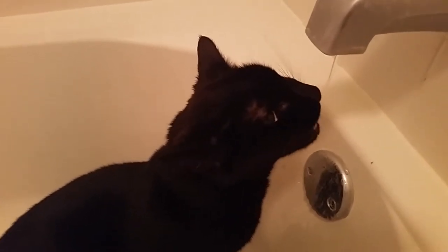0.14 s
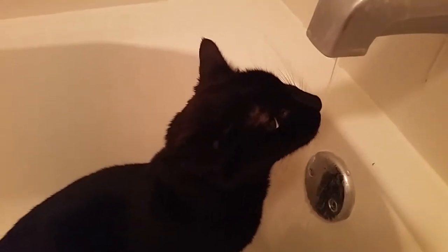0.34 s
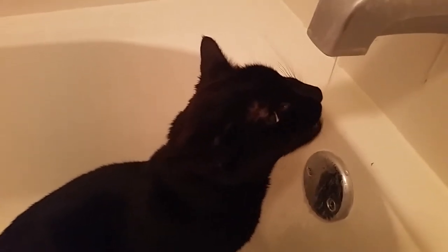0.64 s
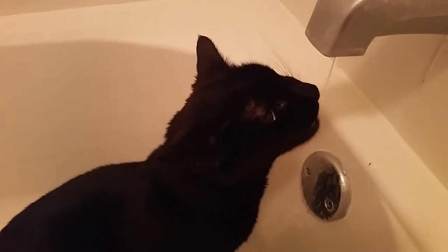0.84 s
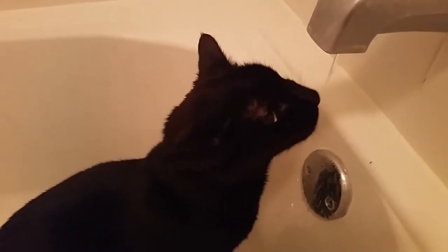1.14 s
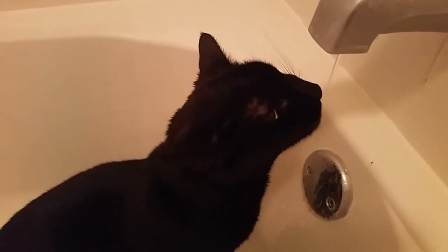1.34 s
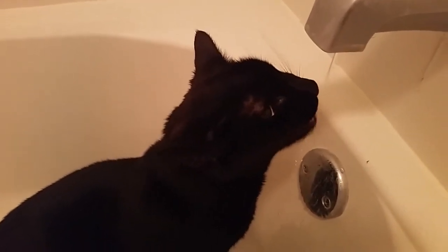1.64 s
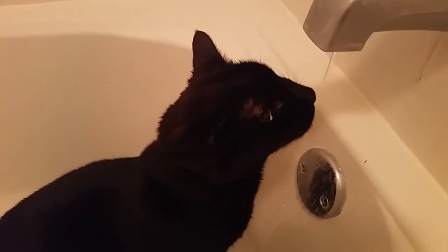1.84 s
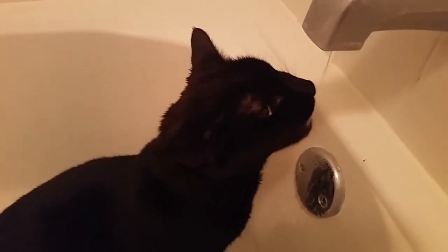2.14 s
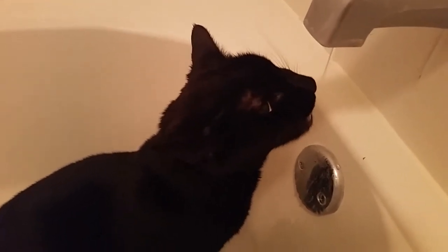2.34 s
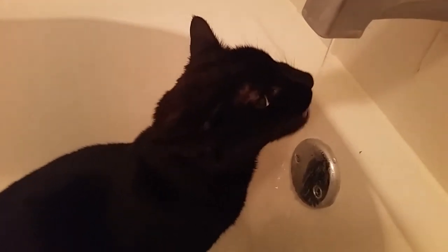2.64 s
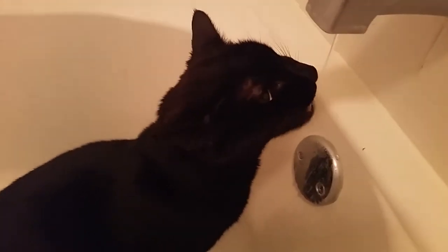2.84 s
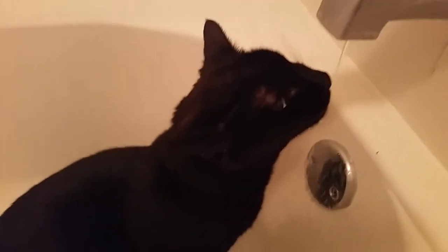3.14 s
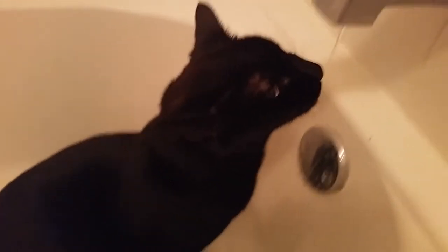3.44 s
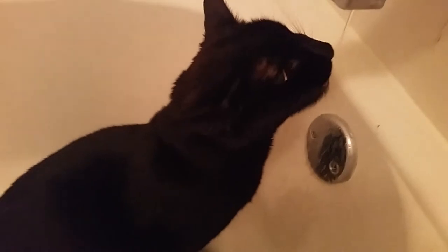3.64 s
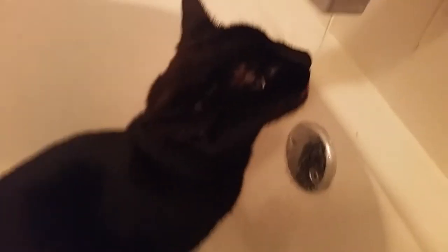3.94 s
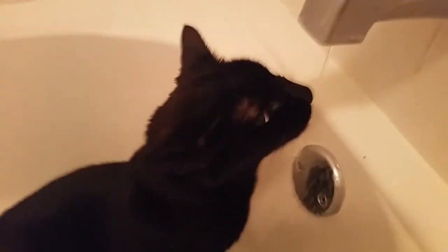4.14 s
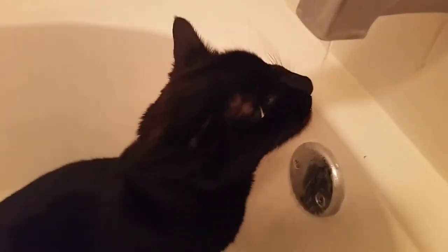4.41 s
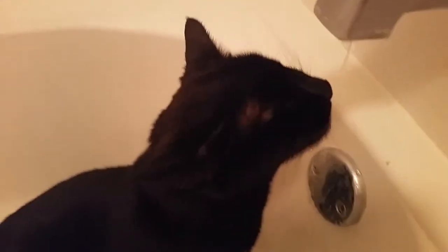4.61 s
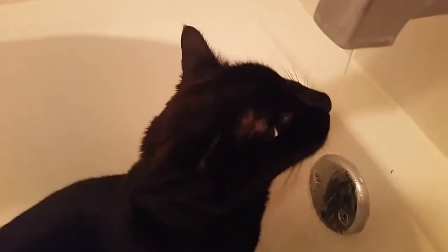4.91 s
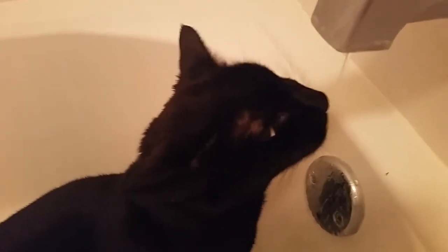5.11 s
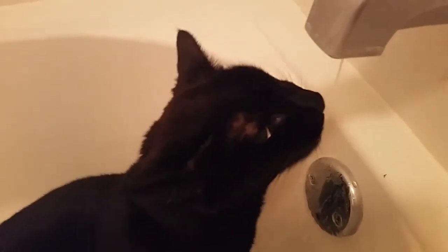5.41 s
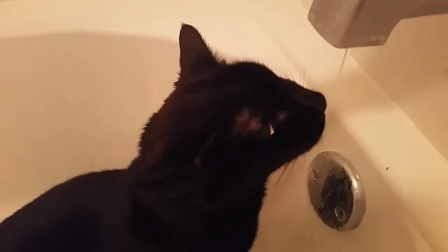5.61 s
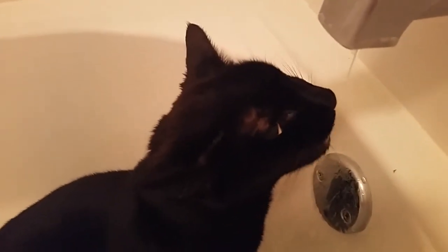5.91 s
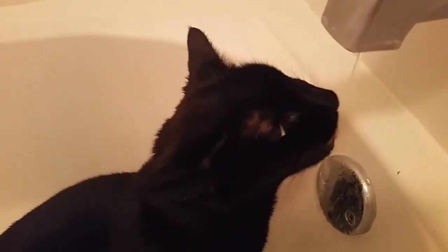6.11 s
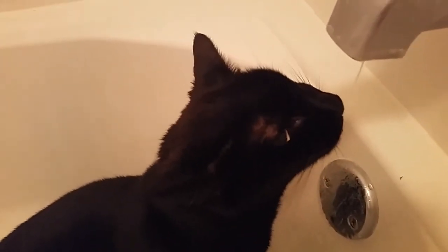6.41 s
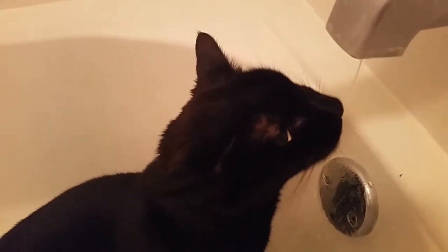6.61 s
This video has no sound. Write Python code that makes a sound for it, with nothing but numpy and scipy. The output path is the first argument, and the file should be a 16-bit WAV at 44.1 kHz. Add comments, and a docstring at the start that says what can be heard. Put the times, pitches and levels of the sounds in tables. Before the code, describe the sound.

A cat laps water from a thin tap stream in a bathtub with wet clicks, while a hand bumps and scrapes the microphone midway.

```python
"""In a bathtub, a cat laps from a thin tap stream, close to a hand-held phone with two microphones.
Each lap is a hollow pop of the mouth and a bright smack of tongue on water that rings on in the tub.
Small drops tick and a faint wet crackle runs between the laps. The hand shifting on the phone case
gives knocks, rumble and a burst of scraping. Room air and the hiss of the stream lie behind it all."""
import sys
import numpy as np
from scipy import signal
from scipy.io import wavfile
from scipy.ndimage import uniform_filter1d

SR = 44100
rng = np.random.default_rng(int(sys.argv[2]) if len(sys.argv) > 2 else 0)


def unload_audio(sound):
    """Save the sound as a 16-bit wav file, at the path given as the first command line argument."""
    columns = np.transpose(np.atleast_2d(sound))
    # keep every value between -1 and 1, then stretch to whole-number steps
    steps = np.round(np.clip(columns, -1, 1) * 32767)
    wavfile.write(sys.argv[1], SR, steps.astype(np.int16))


N = 298116

# Pops of the tongue: t/s, level/dB, boost of the upper mouth tones/dB
TONGUE_POPS = [(0.116, -41, -16), (0.323, -43.5, -13.5), (0.658, -53.5, 3), (0.885, -53, -5),
               (1.084, -44.5, -18), (1.397, -60, 11.5), (1.586, -49, -12), (1.785, -45, -17),
               (2.11, -49.5, -5.5), (2.299, -47, -15), (2.499, -47.5, -10), (2.848, -52.5, 3.5),
               (3.035, -43, -10), (4.46, -51, -1.5), (4.83, -52, -8), (5.157, -49.5, -3),
               (5.345, -42, -11.5), (5.536, -43, -11), (5.682, -51, -15), (5.878, -45.5, -6),
               (6.082, -43.5, -13.5), (6.283, -33.5, -24), (6.49, -41, -11.5), (6.513, -44.5, -13)]
# Tones of the hollow mouth: f/Hz, level/dB, time to fade by 60 dB/s
MOUTH_TONES = [(491, 12, 0.012), (1346, 15, 0.0096), (1020, 5, 0.021), (2060, 6, 0.004)]
# Tongue hits water: t/s, level/dB, then relative to it: top band/dB, two low bands/dB, click/dB
WATER_SMACKS = [(0.1434, -51, 5, 0, 8), (0.172, -51, 17.5, -4, 8.5), (0.348, -49, 7, 1, 5),
                (0.428, -74, 18.5, -5, 13), (0.6903, -48, 3, -4, -0.5), (0.805, -63.5, 16.5, 1.5, 7),
                (0.845, -55, 1, -4.5, 9.5), (0.885, -44.5, 2.5, -13.5, 3.5), (1.0911, -54, 0.5, -11, 22.5),
                (1.614, -50, 7.5, -5.5, 4), (1.8096, -52, 3, -5, 14.5), (2.1406, -58.5, 6, -4, 12.5),
                (2.334, -50.5, 1.5, -12.5, 10), (2.525, -47, 2.5, -5, 8), (2.8768, -50, 1.5, -5, 9.5),
                (3.073, -48.5, 0, -4.5, 4), (3.144, -59.5, 15, -2, 10), (3.266, -43.5, 0, -11, 3),
                (3.332, -49, 2.5, -10, 8.5), (3.4753, -53, -1, -1.5, 11), (3.631, -78, -22, -8, 10),
                (3.748, -51, -5, -6.5, 7.5), (3.7953, -39.5, 3, -8, 5), (3.972, -38.5, 3.5, -11, 2),
                (4.1, -46.5, 15, -8, -9), (4.4864, -58.5, 2, -18, 23.5), (4.6646, -54, -5, -3.5, 4.5),
                (4.853, -53, 2, 0, 7), (5.3711, -50, 5.5, -0.5, 8), (5.406, -74, 20, -14, 16),
                (5.5654, -55, -2, -5.5, 17), (5.5931, -54.5, -5, -18, 27.5), (5.93, -57.5, 6, -6, 7),
                (6.1079, -52.5, 4, -6.5, 5.5), (6.3113, -51.5, 8, 0.5, 8), (6.517, -50.5, 4, 0, 7)]
# Bands in which the wet sounds lie, highest first: f/Hz, width/Hz, pan/dB (pan is left level minus right level)
WET_BANDS = [(11880, 5300, -5.5), (7450, 2900, 5), (4400, 2700, -1), (1540, 2500, 6.5)]
# Drops and bubbles at the mouth: t/s, level/dB, f/Hz
DROP_TICKS = [(0.169, -44, 3870), (0.3596, -40.5, 3900), (0.374, -41, 4200), (0.7432, -49, 3820),
              (1.679, -49.5, 3800), (2.931, -45, 3560), (3.0312, -49.5, 3550), (3.4696, -47, 3650),
              (4.723, -48, 3540), (4.8112, -49, 3670), (4.8226, -48, 3460), (4.8539, -46, 4950),
              (4.9673, -50, 3500), (5.239, -50, 3580), (6.1833, -51, 3470), (5.5598, -48, 3570),
              (5.9646, -45.5, 3530), (6.5405, -45, 3360)]
# Fingers knock the case: t/s, level/dB, f/Hz, pan/dB, relative level of the sharp edge/dB
FINGER_KNOCKS = [(1.067, -29, 142, -17, -25), (1.179, -31, 122, -16, -41), (1.21, -27.5, 140, -11, -34),
                 (1.415, -29.5, 137, -14, -21), (1.9215, -33.5, 134, -10, -21),
                 (2.347, -21.5, 121, -15, -18), (2.751, -25.5, 97, 15, 5.5), (2.992, -21.5, 203, 8, -4),
                 (3.0001, -23.5, 224, 16, 11.5), (3.16, -25, 74, -12, -4.5), (3.22, -10, 110, 14, -12),
                 (3.421, -10.5, 102, 27, -12), (3.491, -31, 122, 5, -4), (3.766, -21.5, 136, -38, -6),
                 (3.791, -13, 76, 12, 2), (3.877, -25.5, 149, -31, -33), (3.912, -24.5, 104, 33, -12),
                 (3.958, -19, 122, 10, -28), (4.048, -7, 104, -21, 6), (4.96, -35, 127, -0.5, -26),
                 (5.679, -37.5, 144, -2, -24)]
# Skin slides over the case: t/s, length/s, grind level/dB, brush level/dB
SKIN_SLIDES = [(3.212, 0.063, -34.5, -52.5), (3.267, 0.14, -51.5, -59), (3.413, 0.11, -43.5, -55.5),
               (3.489, 0.093, -32.5, -60), (3.625, 0.081, -60, -51.5), (3.713, 0.037, -47, -57),
               (3.773, 0.029, -30.5, -49.5), (3.879, 0.018, -44.5, -51.5), (3.903, 0.026, -39.5, -57),
               (3.94, 0.03, -35, -49.5), (3.966, 0.068, -82, -58.5), (4.057, 0.057, -28.5, -53.5),
               (4.119, 0.071, -36.5, -53.5), (4.165, 0.048, -33.5, -52), (4.23, 0.13, -47, -66.5),
               (4.472, 0.13, -46, -72), (4.61, 0.069, -49, -90), (5.413, 0.077, -51.5, -88),
               (6.362, 0.21, -62, -63.5)]
# Tone colour of the skin's low grind: f/Hz, relative level/dB
GRIND_COLOUR = [(47, -56), (80, 0.5), (261, -1.5), (451, -10), (1210, -20), (1660, -33), (3000, -56),
                (6600, -120)]
# Tone colour of its softer brushing: f/Hz, relative level/dB
BRUSH_COLOUR = [(600, 25.5), (1300, 27), (2400, 19.5), (3600, 2), (5000, -61)]
# Tone colour of its bright rustle: f/Hz, relative level/dB
RUSTLE_COLOUR = [(1470, -22), (2500, -4.5), (3690, 0), (4680, -10), (6740, 3.5), (8230, -7.5), (11900, -5),
                 (14600, -13), (15000, -60)]
# Rumble of the gripping hand over time: t/s, level/dB, pan/dB
GRIP_LEVELS = [(0, -44, -12), (1.7, -46.5, -3), (2.25, -52, -5.5), (2.7, -41, -2), (3.6, -35.5, -3.5),
               (4.2, -35.5, 8.5), (4.7, -48.5, 12), (5.45, -45, 10), (5.9, -51.5, 10.5), (6.76, -49, 12.5)]
# Tone colour of that rumble: f/Hz, relative level/dB
RUMBLE_COLOUR = [(18, -40), (30, 9.5), (146, 0.5), (195, -8), (484, -21), (700, -28.5), (1540, -120)]
# Tone colour of room air and tap hiss: f/Hz, relative level/dB
AIR_COLOUR = [(240, 3.5), (400, 1), (1640, -17), (2000, -9), (2870, -22), (3830, -22.5), (5110, -21),
              (5950, -26), (6920, -15.5), (9370, -29), (12100, -17.5), (14100, -22), (15000, -78)]
# Which side the air and hiss lean to: f/Hz, pan/dB
AIR_SIDES = [(500, 1.5), (2000, 5.5), (5000, -2.5), (12000, -1)]
# Treble of the hiss over time: t/s, relative level/dB
HISS_TREBLE = [(0, 9.5), (0.5, 2.5), (2.8, -1), (4.3, 1), (6.76, 0.5)]


def tongue_pops():
    """The hollow mouth rings briefly as the tongue tears loose from it."""
    out, t = np.zeros((2, N)), np.arange(2000) / SR
    for (start, db, upper_db), detune in zip(TONGUE_POPS, rng.standard_normal((len(TONGUE_POPS), 4))):
        boosts_db = [0, upper_db, upper_db, upper_db]
        mouth = sum(amp(tone_db + boost_db) * ring(t, hz * (1 + 0.05 * off), fade_s)
                    for (hz, tone_db, fade_s), boost_db, off in zip(MOUTH_TONES, boosts_db, detune))
        tear = 0.17 * rng.standard_normal(400) * fade(t[:400], 0.0035)
        tear[0] = 1  # one clean kick leads the rough tearing
        pop = np.convolve(mouth * rise(t, 0.00091), tear)
        add(out, start, amp(db) * panned(2.2) * pop)
    return out + amp(-10) * tub_echo(out, fade_s=0.18, dull_hz=2500)


def water_smacks():
    """The tongue hits with a sharp click, then the water film breaks in tiny snaps."""
    out, t = np.zeros((2, N)), np.arange(6000) / SR
    for start, level_db, top_db, low_db, click_db in WATER_SMACKS:
        detune, drift = rng.standard_normal((2, 4, 1))
        bands = wet_hiss(len(t), pitch_ratios=1 + 0.03 * detune + 0.05 * drift * rise(t, 0.04))
        shared = snaps(len(t), per_s=100, spread_db=0.5, fade_s=0.0066)
        click = amp(click_db) * fade(t, 0.0083)
        for db, band in zip([top_db, 0, low_db, low_db - 0.5], bands):
            film = 0.04 + 0.56 * shared + 0.41 * snaps(len(t), per_s=260, spread_db=4, fade_s=0.0033)
            shape = click + film * rise(t, 0.0049) * fade(t, 0.28)
            add(out, start, amp(level_db + db) * shape * rise(t, 0.00043) * band)
    return out + amp(-2.5) * tub_echo(out, fade_s=0.22, dull_hz=10400)


def wet_hiss(size, pitch_ratios):
    """Bands of hiss for the wet sounds, each with a narrow peak that can glide."""
    white, bands = rng.standard_normal((2, size)), []
    for (hz, width, pan_db), ratio in zip(WET_BANDS, pitch_ratios):
        wide = signal.butter(3, [hz - width / 2, hz + width / 2], "bandpass", fs=SR, output="sos")
        hiss = evened(signal.sosfilt(wide, white))
        # Shift the peak's pitch down to zero, smooth there, and shift back up.
        turn = np.exp(2j * np.pi * np.cumsum(hz * ratio * np.ones(size)) / SR)
        hold = np.exp(-np.pi * hz / 11 / SR)
        peak = evened((turn * signal.lfilter([1 - hold], [1, -hold], hiss / turn)).real)
        bands.append(panned(pan_db) * evened(0.4 * hiss + peak))
    return bands


def snaps(size, per_s, spread_db, fade_s):
    """Loudness outline of tiny snaps at random times, a few stronger than the rest."""
    strength = amp(spread_db * np.minimum(rng.exponential(1, size), 4))
    happens = rng.random(size) < per_s / SR
    return signal.lfilter([1], [1, -fade(1 / SR, fade_s)], strength * happens)


def tub_echo(sound, fade_s, dull_hz):
    """The hard tub walls throw back many quick echoes that die away."""
    echoes = np.zeros((2, SR // 2))
    slots = np.arange(90, SR // 2 - 20, 20)
    delays = slots + rng.integers(0, 20, (2, len(slots)))
    np.put_along_axis(echoes, delays, rng.choice([-1., 1.], delays.shape), 1)
    echoes *= fade(np.arange(SR // 2) / SR, fade_s)
    echoes = signal.lfilter(*signal.butter(1, dull_hz, fs=SR), echoes)
    return signal.fftconvolve(sound, echoes / np.linalg.norm(echoes[0]), axes=1)[:, :N]


def wet_crackle():
    """Faint, soft-edged wet snaps carry on between the laps."""
    shared = snaps(N, per_s=10, spread_db=2.5, fade_s=0.015)
    per_band = [snaps(N, per_s=10, spread_db=2.5, fade_s=0.01) for _ in WET_BANDS]
    softened = uniform_filter1d(shared + np.array(per_band), size=40, axis=1)
    levels_db, bands = [-60, -66.5, -97.5, -98], wet_hiss(N, pitch_ratios=np.ones(4))
    return sum(amp(db) * shape * band for db, shape, band in zip(levels_db, softened, bands))


def droplets():
    """Each small drop is a short tick that echoes in the tub; fainter ones fall at random."""
    out, t = np.zeros((2, N)), np.arange(600) / SR
    stray_per_s, stray_db, stray_hz = 6, -63, 3635
    wait, size, pitch = rng.random((200, 3)).T
    times = np.cumsum(-np.log(1 - wait)) / stray_per_s
    strays = np.transpose([times, stray_db + 9 * size, stray_hz * (1 + 0.3 * (pitch - 0.5))])
    for start, db, hz in [*DROP_TICKS, *strays[times < N / SR]]:
        tick = ring(t, hz, 0.008) + 0.35 * ring(t, 2.3 * hz, 0.003)
        add(out, start, amp(db) * panned(3.2) * tick * rise(t, 0.00014))
    return out + amp(-9) * tub_echo(out, fade_s=0.14, dull_hz=8000)


def finger_knocks():
    """A finger bumps the case: a low thump, a sharp edge and the case's hollow ring."""
    out, t = np.zeros((2, N)), np.arange(8000) / SR
    clack = ring(t, 380, 0.0049) + 0.41 * ring(t, 1030, 0.0085) + 0.14 * ring(t, 2430, 0.0051)
    bright = evened(signal.lfilter(*signal.iirpeak(11900, 3, fs=SR), rng.standard_normal(len(t))))
    edge = amp(-24.5) * fade(t, 0.0045) * bright - clack * rise(t, 0.00069)
    case_ring = ring(t, 259.2, 0.44) * rise(t, 0.022)
    soft_cycles, soft_db, damping = 10.5, -25, 0.86
    for start, db, hz, pan_db, edge_db in FINGER_KNOCKS:
        # A harder knock presses on longer and so stops its own thump sooner.
        fade_s = soft_cycles / hz * amp(-damping * max(db - soft_db, 0))
        falling_hz = hz * (1 + 1.1 * np.exp(-t / 0.006))
        thump = -ring(t, falling_hz, fade_s) * rise(t, 0.0007)
        knock = thump / abs(thump).max() + amp(edge_db) * edge
        flip = [[1], [-1 if pan_db > 0 else 1]]  # a knock on the left turns the right wave upside down
        add(out, start, amp(db) * panned(pan_db) * flip * knock)
        add(out, start, amp(db + 0.37 * edge_db - 20) * np.outer([1, 0.3], case_ring))
    return out


def skin_scrapes():
    """Skin slips unevenly near the left microphone: a low grind, a brushing and a bright rustle."""
    grind = noise(GRIND_COLOUR, patchy_db=1.5, alike=0.07, size=1024)
    grind *= wobble(0.0054, 3) * wobble(0.016, 1.8)
    brush = noise(BRUSH_COLOUR, patchy_db=1, alike=0.033, size=256) * wobble(0.0069, 0.23)
    rustle = noise(RUSTLE_COLOUR, patchy_db=3.2, alike=0.081, size=256) * wobble(0.0035, 2.1)
    low = panned(15.5) * grind
    high = panned(7.75) * brush + amp(-8.5) * panned(0.045) * rustle
    out = np.zeros((2, N))
    for start, length, grind_db, brush_db in SKIN_SLIDES:
        t = np.arange(0, length + 0.071, 1 / SR)
        swell = 0.89 + 0.81 * np.sin(np.pi * np.minimum(t / length, 1))
        let_go = np.exp(-np.maximum(t - length, 0) / 0.009)
        here = round(start * SR) + np.arange(len(t))
        rub = amp(grind_db) * low[:, here] + amp(brush_db) * high[:, here]
        add(out, start, rise(t, 0.0017) * swell * let_go * rub)
    return out


def grip_rumble():
    """The hand shifting its grip makes a lumpy rumble, unrelated at the two microphones."""
    db, pan_db = over_time(GRIP_LEVELS, np.arange(N) / SR)
    rumble = noise(RUMBLE_COLOUR, patchy_db=2.93, alike=0, size=2048)
    return amp(db) * panned(pan_db) * wobble(0.019, 2.2) * rumble


def air_and_tap():
    """Steady room air and the faint hiss of the stream, whose treble drifts in level."""
    size = 512
    grid, hz = noise_grid(AIR_COLOUR, patchy_db=3.34, alike=0.094, size=size)
    treble_db, = over_time(HISS_TREBLE, np.arange(grid.shape[2]) * (size // 4) / SR)
    treble_share = np.clip(hz / 3000 - 2.3, 0, 1)
    grid *= amp(np.outer(treble_share, treble_db))
    grid *= panned(over_pitch(AIR_SIDES, hz))[..., None]
    return amp(-57.5) * grid_to_sound(grid, size)


def noise_grid(colour, patchy_db, alike, size):
    """Noise laid out by side, pitch and time, with drifting patches; alike=0 makes unrelated sides."""
    frames, hz = 4 * N // size + 5, np.fft.rfftfreq(size, 1 / SR)
    a, b, c, d, patches = rng.standard_normal((frames, len(hz), 5)).T
    patches = evened(uniform_filter1d(uniform_filter1d(patches, size=9, axis=0), size=9, axis=1))
    left = a + 1j * b
    right = alike * left + np.sqrt(1 - alike ** 2) * (c + 1j * d)
    return np.array([left, right]) * amp(over_pitch(colour, hz)[:, None] + patchy_db * patches), hz


def grid_to_sound(grid, size):
    return evened(signal.istft(grid, nperseg=size, noverlap=3 * size // 4)[1][:, :N])


def noise(colour, patchy_db, alike, size):
    return grid_to_sound(noise_grid(colour, patchy_db, alike, size)[0], size)


def wobble(width_s, depth_db):
    """Randomly wavering loudness, one curve for each microphone."""
    width = int(width_s * SR)
    slow = uniform_filter1d(rng.standard_normal((2, N)), width, axis=1)
    slow = evened(uniform_filter1d(slow, width, axis=1))
    return evened(amp(depth_db * slow))


def amp(db):
    return 10 ** (np.asarray(db) / 20)


def rise(t, rise_s):
    return 1 - np.exp(-t / rise_s)


def fade(t, fade_s):
    """Falls by 60 dB in fade_s seconds."""
    return amp(-60 * t / fade_s)


def ring(t, hz, fade_s):
    return fade(t, fade_s) * np.sin(2 * np.pi * hz * t)


def evened(x):
    """Scales a signal to an average power of one."""
    return x / np.sqrt(np.mean(x ** 2) + 1e-20)


def over_pitch(table, hz):
    table_hz, values = np.transpose(table)
    return np.interp(np.log(hz + 1), np.log(table_hz + 1), values)


def over_time(table, t):
    times, *columns = np.transpose(table)
    return [np.interp(t, times, column) for column in columns]


def panned(pan_db):
    """Left and right gains, one row each, with an average power of one."""
    gains = amp(np.vstack([pan_db / 2, -pan_db / 2]))
    return gains / np.sqrt((gains ** 2).mean(0))


def add(mix, start_s, sound):
    part = mix[:, round(start_s * SR):][:, :sound.shape[1]]
    part += sound[:, :part.shape[1]]


def scene():
    """The drinking cat, the hand on the phone and the background, added together."""
    cat = tongue_pops() + water_smacks() + wet_crackle() + droplets()
    hand = finger_knocks() + grip_rumble() + skin_scrapes()
    return cat + hand + air_and_tap()


def record(dry):
    """The microphones lose the deepest bass and the highest treble; a last steep cut trims the top."""
    thinned = signal.lfilter(*signal.butter(2, 35, "highpass", fs=SR), dry)
    dulled = signal.sosfilt(signal.butter(12, 14700, fs=SR, output="sos"), thinned)
    top_cut = signal.firwin(511, 15700, window=("kaiser", 9), fs=SR)
    return signal.oaconvolve(dulled, top_cut[None], "same")


dry = scene()
out = record(dry)
unload_audio(out)
```